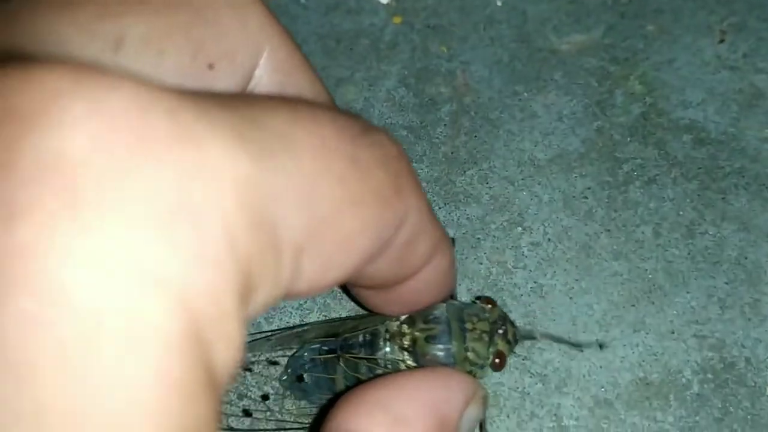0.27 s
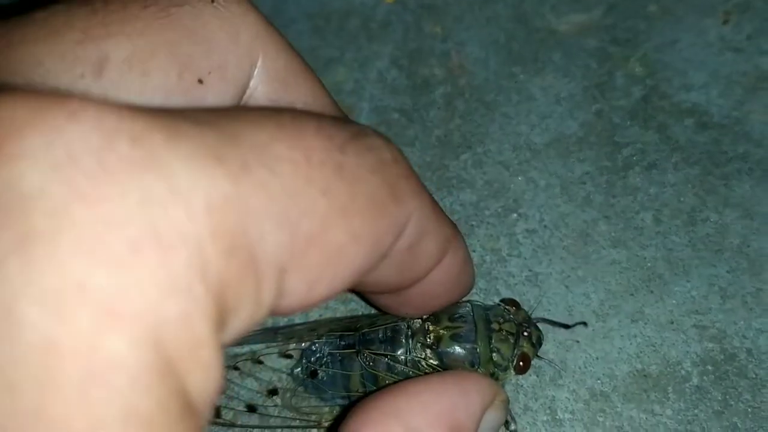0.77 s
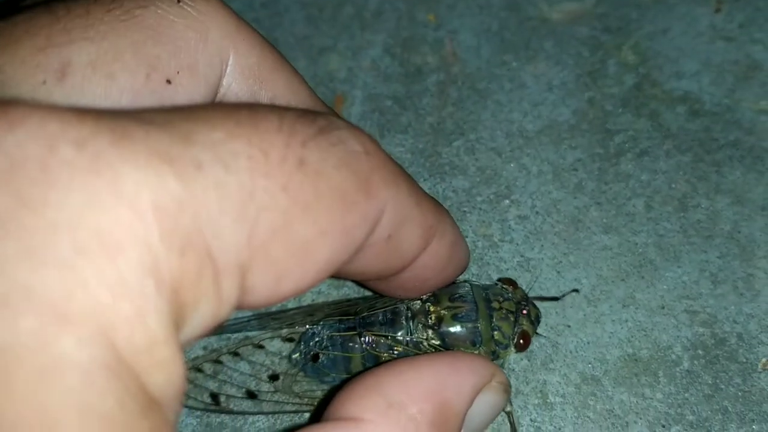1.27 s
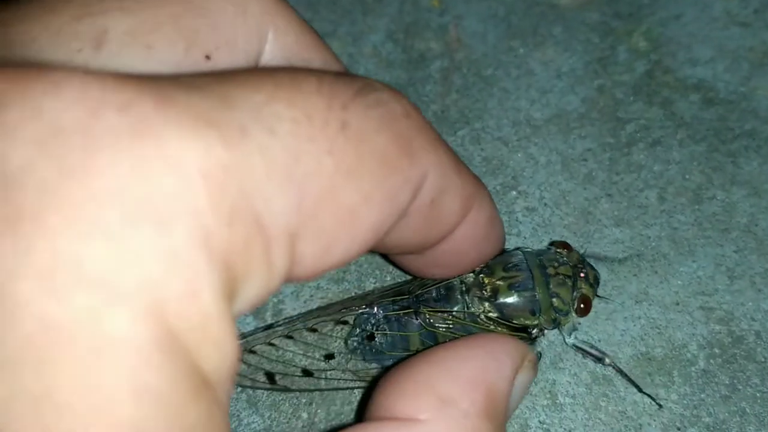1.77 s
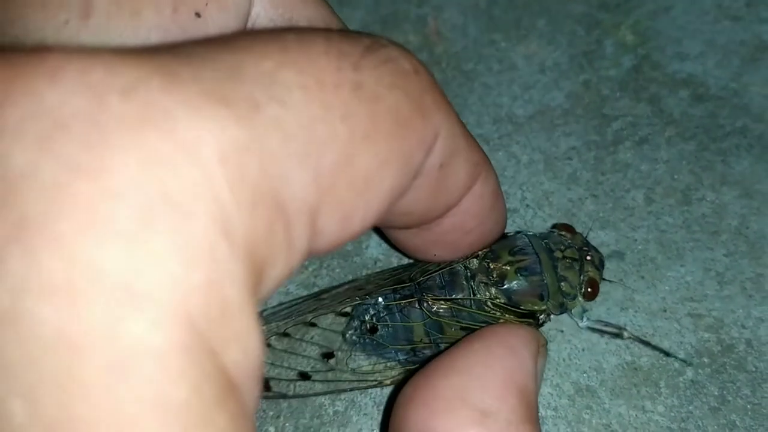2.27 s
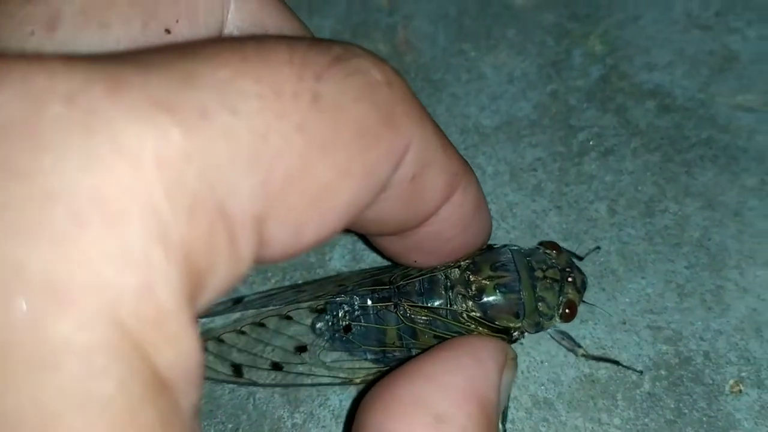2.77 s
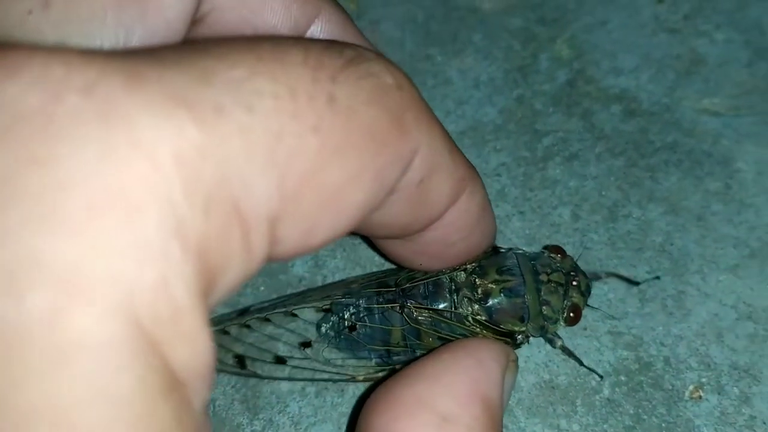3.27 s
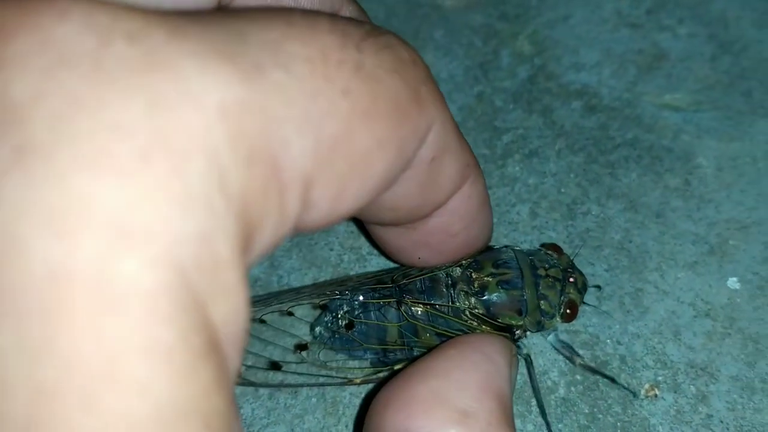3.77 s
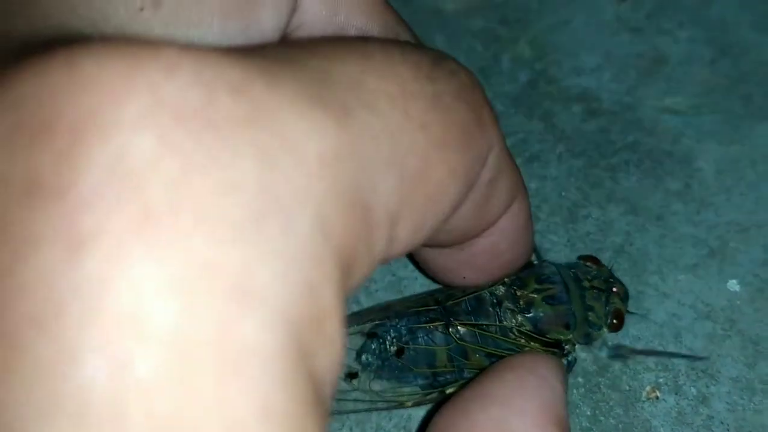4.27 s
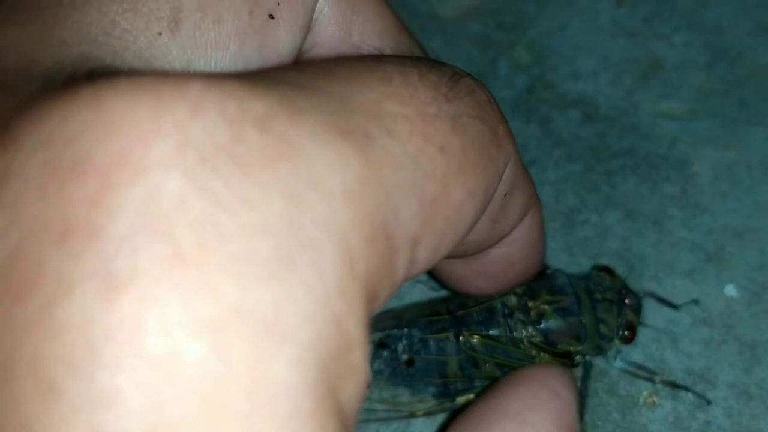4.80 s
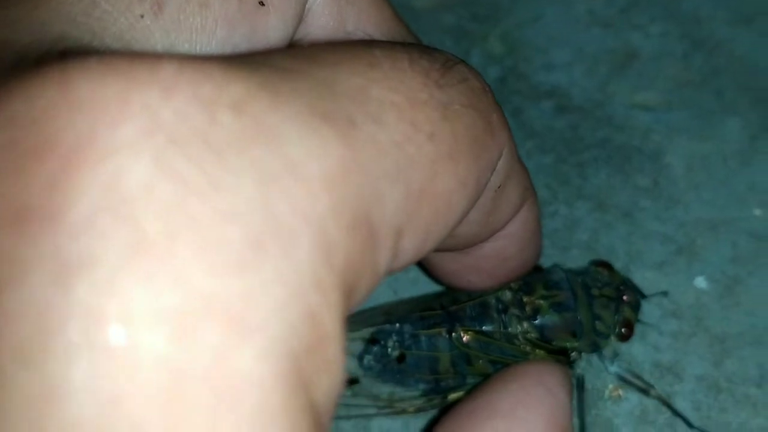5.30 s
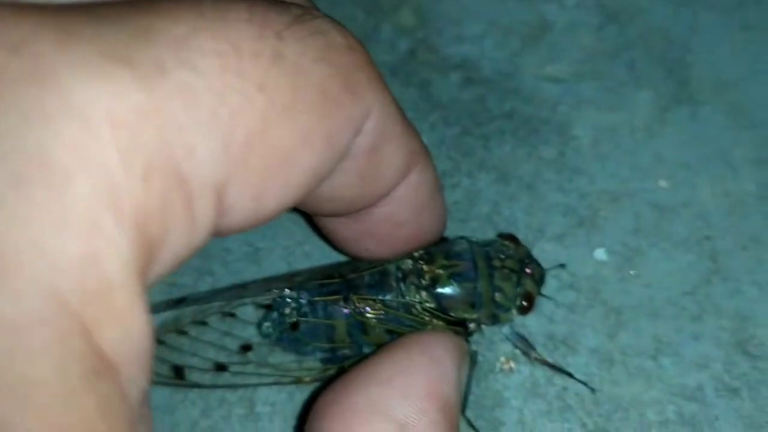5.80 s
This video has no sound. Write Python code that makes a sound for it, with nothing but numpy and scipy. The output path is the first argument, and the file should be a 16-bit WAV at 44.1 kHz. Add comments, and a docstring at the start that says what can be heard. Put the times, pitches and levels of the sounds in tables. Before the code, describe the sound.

Close, harsh cicada buzzes, some paired, break out and stop; a few tiny leg ticks follow above thin distant insect tones and mains hum.

```python
"""From the start a hum, a low rumble and thin, steady bands of far night insects lie under the scene.
At 0.4 s a cicada held between two fingers, close to the microphone, starts its short buzzes: its two tymbals
buckle in turn, each buckle a quick run of rib clicks over a falling note of the hollow abdomen.
Two small ticks fall at 2.2 s and the hum is fullest from 2.65 to 3.75 s; the last buzz ends at 4.1 s.
Then only a few ticks of legs and wings, and very faint claw scrapes, stand out from the background."""
import sys
import numpy as np
from scipy import signal
from scipy.fft import rfft, irfft, next_fast_len
from scipy.io import wavfile
from scipy.ndimage import map_coordinates

SR = 44100
rng = np.random.default_rng(int(sys.argv[2]) if len(sys.argv) > 2 else 0)


def materialize(psi):
    """Save the field psi as 16-bit PCM at rate SR to the path in sys.argv[1].

    A 1-D psi becomes a single channel; in a 2-D psi each row is a channel.
    """
    bounded = np.clip(np.atleast_2d(psi).T, -1, 1)
    quanta = np.round(bounded * 32767).astype(np.int16)
    wavfile.write(sys.argv[1], SR, quanta)


N = 266628  # samples

# buzzes, levels and pan before the trims in cicada(): first buckle t/s, last buckle t/s, buckle rate f/Hz,
#   final slowing/share, abdomen f/Hz, fall of its note/share, tymbal ring f/Hz,
#   ring peak level/dB against the other resonances, abdomen level/dB, body wall level/dB against the abdomen,
#   rib level/dB, snap level/dB, rib swell from start to end/dB, lean to the last ribs/dB, left over right/dB
BUZZES = [ (0.4174, .4175, 190, .35, 1005, 0.074, 5310, 1, -21, -14.5, -21.5, -27, 11, 3, 5),
          (.431, .5915, 192, 0.34, 1050, 0.16, 5380, -0.5, -22.5, -9, -21.5, -26.5, -0.5, -2.5, 3),
          (0.658, .667, 160, .35, 1090, .24, 5346, 4, -25.5, -7, -25, -30.5, 5, 1.5, 5.5),
          (1.628, 1.669, 205, 0.29, 1118, 0.063, 5230, 4, -21.5, -14, -35.5, -38, 5, -3, 5),
          (1.7774, 1.847, 192, 0.2, 1058, 0.15, 5285, 6, -24.5, -9.5, -30, -37.5, 8.5, -3, 5),
          (2.5723, 2.61, 180, 0.47, 1085, 0.24, 5730, -10, -25, -9.5, -30.5, -37.5, 4, 1.5, 7),
          (2.617, 2.6875, 200, .5, 1048, 0.29, 5710, 4.5, -26, -6, -23.5, -35.5, 3, 1, 6.5),
          (3.0214, 3.133, 186, 0.44, 1092, 0.29, 5810, -2, -25.5, -6.5, -21, -34, -1, 2, 3.5),
          (3.338, 3.449, 185, 0.44, 1050, .3, 5815, 4.5, -25.5, -6, -22, -34, 2.5, 2, 7.5),
          (4.0205, 4.1212, 183, 0.41, 1052, 0.18, 6204, 2, -21.5, -9.5, -19, -27.5, 1, 3, 2.5)]
# upper resonances of the tymbals: centre f/Hz, width f/Hz, left level/dB, right level/dB
TYMBAL_MODES = [(5525, 410, 3, -1.5), (6440, 570, -2.5, -10), (7290, 470, -1.5, -5), (8050, 350, -4, 0.5)]
# resonances of the body wall: centre f/Hz, width f/Hz, left level/dB, right level/dB
WALL_MODES = [(1480, 340, -8, -0.5), (2176, 330, 1, -4), (2740, 300, 2.5, -15), (3280, 340, 1, 5.5),
              (4170, 350, -10.5, -1)]
# colour of the abdomen's opening, which holds back the bass: f/Hz, level/dB
OPENING_COLOUR = [(500, -3), (700, -4), (860, -5.5), (1300, 4.5), (1480, 10.5), (1750, -8)]
# colour of a rib's dry snap: f/Hz, relative spectral level/dB
SNAP_COLOUR = [(500, -19), (4500, -6.5), (8000, -2), (9500, 0.5), (11000, -3), (12200, -1), (13600, -2.5),
               (14500, -6), (15300, -15), (15900, -28)]
# ticks of legs, wings and the grip: t/s, level/dB before the trim in ticks(), left over right/dB,
#   centre f/Hz, width f/Hz
TICKS = [(2.163, -25, 2, 5170, 2200), (2.1852, -29, 6, 5963, 1100), (4.714, -24.5, 6, 7000, 2000),
         (4.969, -24, 6, 8650, 7450), (5.1745, -33.5, 5, 7000, 3500), (5.943, -33, 7, 600, 900)]
# decay of the yard's answer: f/Hz, t60 t/s
YARD_DECAY = [(300, 0.05), (1200, .14), (6000, 0.2), (14000, 0.13)]
# distant insect choruses: centre f/Hz, width f/Hz, mean level/dB, left over right/dB
CHORUS_BANDS = [(3618, 584, -54.5, 6.5), (6643, 540, -53, 9), (7510, 240, -60.5, 5.5),
                (9240, 690, -59, 1.5), (10250, 800, -54.5, -1)]
# colour of the rumble and air: f/Hz, relative spectral level/dB
RUMBLE_COLOUR = [(20, -33), (36, -16.5), (48, -8.5), (58, 3), (74, -4), (110, -11), (140, -10.5),
                 (170, -17.5), (300, -19), (450, -23), (700, -29), (1200, -34.5), (3000, -33.5),
                 (10500, -52.5), (12000, -62)]
# likeness of the rumble at the two ports: f/Hz, left-right correlation/share
RUMBLE_LIKENESS = [(130, 0.87), (290, 0.99), (640, .54), (1400, 0)]

# each buzz starts with the abdomen a little weak and sharp; it builds up fast and its note sags slowly
SETTLE_S, START_WEAK_DB = 0.0062, 1.5
SAG_S, START_SHARP = 0.029, 0.025  # sharpness as a share of the pitch
SNAP_FOLLOWS = 0.72  # share of the ribs' swell that the snap follows
RELEASE_S, RELEASE_DB = 0.011, 2  # the ribs ease off as the muscles let go
# the hum holds full level between two times and fades slowly to either side
HUM_HZ, HUM_DB, HUM_FADE_DB_PER_S = 100.1, -36.5, 2
HUM_FULL_S, HUM_FADE_S = 2.65, 3.75
TOP_HZ = 15900


def cicada(note_db=0.5, ring_db=1.0, snap_db=4.0, ring_width_hz=520, ring_right_db=-5,
           tymbal_split=0.021, pan_offset_db=-2.0, lag_s=0.00019, buckle_s=0.007):
    """Every buckle sounds the abdomen and sets off a run of rib clicks in the tymbal and the body wall."""
    notes = np.zeros(N)
    rings, walls, snaps = np.zeros((3, 2, N))
    for (first, last, rate, slowing, abdomen_hz, fall, ring_hz, peak_db, abdomen_db, wall_db,
         rib_db, bright_db, swell_db, lean_db, pan_db) in BUZZES:
        times = buckle_times(first, last, rate, slowing)
        length_s = last - first + buckle_s
        span = slice(round(first * SR), round(last * SR) + SR // 40)
        age = np.arange(span.stop - span.start) / SR
        body_push_db, rib_push_db, snap_push_db = effort(age, length_s, swell_db)
        body_gain = amp(abdomen_db + body_push_db)

        note = np.zeros(N)
        for k, s in enumerate(times):
            sharp = START_SHARP * np.exp((first - s) / SAG_S)
            # one tymbal is tuned a little higher than the other
            split = tymbal_split * (-1) ** k
            hz = abdomen_hz * (1 + sharp + split + rng.normal(0, 0.016))
            add(note, s, amp(rng.normal(0, 0.95)) * abdomen_note(hz, fall))
        note = filtered(note[span], lambda hz: amp(along(OPENING_COLOUR, hz)))
        add(notes, first, body_gain * levelled(note, length_s))

        # each tymbal has its own paths out of the grip
        clicks = sum(between_fingers(rib_clicks(times[side::2], ring_hz, lean_db)[span]) for side in (0, 1))
        # muscle tension sets the tymbal's main resonance
        tymbal = list(TYMBAL_MODES) + [(ring_hz, ring_width_hz, peak_db, peak_db + ring_right_db)]
        ring = filtered(crackle(clicks, share=0.11), lambda hz: resonances(tymbal, hz))
        ring_gain = amp(rib_db + rib_push_db) * panned(pan_db + pan_offset_db)
        add(rings, first, ring_gain * levelled(ring, length_s))

        wall = filtered(crackle(clicks, share=1.0), lambda hz: resonances(WALL_MODES, hz))
        add(walls, first, body_gain * amp(wall_db) * levelled(wall, length_s))

        snap = filtered(crackle(clicks, share=0.76), lambda hz: amp(along(SNAP_COLOUR, hz)))
        add(snaps, first, amp(bright_db + snap_push_db) * levelled(snap, length_s))

    # the note reaches the right port first
    ports = np.array([[-1], [1]])
    notes = filtered(notes, lambda hz: np.exp(1j * np.pi * hz * lag_s * ports))
    return notes * amp(note_db) + walls + rings * amp(ring_db) + snaps * amp(snap_db)


def buckle_times(first, last, rate, slowing, slow_s=.021, limp=.05, jitter_s=.00018):
    """The two tymbals take turns, a little unevenly, and slow down as the muscles let go."""
    t = np.linspace(first, max(first, last), 200)
    rate_now = rate * (1 - slowing * np.exp((t - t[-1]) / slow_s))
    turns = np.cumsum(rate_now) * (t[1] - t[0])
    times = np.interp(np.linspace(0, turns[-1], round(turns[-1]) + 1), turns, t)
    late = limp / rate * (np.arange(len(times)) % 2)  # every second buckle
    return times + late + rng.normal(0, jitter_s, len(times))


def effort(age, length_s, swell_db):
    """Level course of a buzz in dB: the abdomen builds up, the ribs swell and ease off, their snap follows."""
    start = START_WEAK_DB * np.exp(-age / SETTLE_S)
    swell = swell_db * (np.minimum(age / length_s, 1) - .5)
    release = RELEASE_DB * np.exp(np.minimum(age - length_s, 0) / RELEASE_S)
    return -start, swell - release, SNAP_FOLLOWS * swell - release


def abdomen_note(hz, fall, length_s=0.0073):
    """One buckle pumps the air sac: a few cycles that swell, sink in pitch and fade."""
    u = np.arange(int(length_s * SR)) / (length_s * SR)
    phase = 2 * np.pi * np.cumsum(hz * (1 + fall * (.42 - u * 1.29))) / SR
    return np.sin(phase) * np.sin(np.pi * u ** 0.64) ** 1.06


def rib_clicks(times, ring_hz, lean_db, lead_s=.0006, scatter_s=.000015, scatter_db=0.2):
    """In each buckle four ribs give way in turn, six ring cycles apart, so that each one feeds the ring."""
    gap_s = 6 / ring_hz
    ribs_db = np.array([-2.5, -21.5, -2.5, -4.5]) + lean_db * np.linspace(-1, 1, 4)
    clicks = np.zeros(N)
    for s in times:
        at = s + lead_s + gap_s * np.arange(4) + np.cumsum(rng.normal(0, scatter_s, 4))
        for rib_s, db in zip(at, ribs_db):
            add(clicks, rib_s, amp([db + rng.normal(0, scatter_db)]))
    return clicks


def between_fingers(clicks, rise_s=0.00011, raw_t60=0.0094):
    """Scattering in the grip smears each click in time, differently for each port."""
    t = np.arange(SR // 50) / SR
    envelope = (1 - np.exp(-t / rise_s)) * amp(-60 * t / raw_t60)  # before the spectrum is flattened
    paths = rfft(rng.standard_normal((2, len(t))) * envelope)
    lead = SR // 500
    # flattened, the paths shift phases only and leave the colour nearly alone
    smear = np.roll(irfft(paths / np.abs(paths)), lead, axis=1)[:, :len(t) // 2]
    return signal.fftconvolve(clicks[None], smear, axes=1)[:, lead:lead + len(clicks)]


def crackle(clicks, share):
    """No two buckles crease alike: a share of the clicks' energy is fresh noise under their envelope."""
    fade = amp(-120 * np.arange(SR // 200) / SR / .004)  # power falls 60 dB in 4 ms
    power = np.abs(signal.fftconvolve(clicks ** 2, fade[None], axes=1))[:, :clicks.shape[1]]
    share = np.clip(share, 0, 1)
    noise = unit(np.sqrt(power) * rng.standard_normal(clicks.shape))
    return np.sqrt(1 - share) * unit(clicks) + np.sqrt(share) * noise


def resonances(modes, hz):
    """Left and right gain of bell-shaped resonances, summed in power."""
    power = 0
    for centre, width, left_db, right_db in modes:
        bell = 1 / (1 + 2 * ((hz - centre) / width) ** 2)
        power = power + (amp([[left_db], [right_db]]) * bell) ** 2
    return np.sqrt(power)


def ticks(t60=0.014, trim_db=-5):
    """Legs and wings flick against the fingers: short bursts of band noise that die away fast."""
    out = np.zeros((2, N))
    t = np.arange(SR // 30) / SR
    for s, db, pan_db, hz, width in TICKS:
        burst = band(rng.standard_normal((2, len(t))), hz, width)
        add(out, s, amp(db + trim_db - 60 * t / t60) * panned(pan_db) * burst)
    return out


def scrapes(level_db=-78, unrest_db=4, centre_hz=13000, width_hz=3500):
    """Claws scrape very faintly on the skin: high band noise that comes in fits and starts."""
    hiss = band(rng.standard_normal((2, N)), centre_hz, width_hz)
    return amp(level_db + unrest_db * np.minimum(wobble(14), 2)) * hiss


def yard(x):
    """A short, faint answer from the concrete floor and the walls: noise that decays band by band."""
    hz, t, z = signal.stft(rng.standard_normal((2, SR // 3)), SR, nperseg=256)
    decay = amp(-60 * t / along(YARD_DECAY, hz)[:, None])
    tail = signal.istft(z * decay, SR, nperseg=256)[1]
    return signal.fftconvolve(x, tail / np.linalg.norm(tail[0]), axes=1)[:, :N]


def night_chorus(shimmer_db=0.9, edge_hz=11000):
    """Many far insects merge into a few thin bands of noise, steady but for a slight shimmer."""
    bands = np.zeros((2, N))
    for hz, width, db, pan_db in CHORUS_BANDS:
        level = amp(db + shimmer_db * wobble(25))
        bands += level * panned(pan_db) * band(rng.standard_normal((2, N)), hz, width)
    return filtered(bands, lambda hz: 1 / (1 + (hz / edge_hz) ** 40))


def hum(waver_db=-0.75, drift_rad=0.15, overtone_db=-25):
    """A mains hum with a weak octave; its level and phase waver slightly."""
    t = np.arange(N) / SR
    outside_s = np.abs(t - np.clip(t, HUM_FULL_S, HUM_FADE_S))
    level_db = HUM_DB - HUM_FADE_DB_PER_S * outside_s
    phase = 2 * np.pi * HUM_HZ * t + drift_rad * wobble(2.9)
    tone = unit(np.sin(phase) + amp(overtone_db) * np.sin(2 * phase))
    return tone * amp(level_db + waver_db * wobble(20)) * panned(1.0)


def rumble(level_db=-42.5):
    """A low rumble with faint air: alike at both ports in the bass, unrelated higher up."""
    def colour(hz):
        # sharing out mid and side by this angle sets the likeness
        angle = np.arccos(np.clip(along(RUMBLE_LIKENESS, hz), -1, 1)) / 2
        return amp(along(RUMBLE_COLOUR, hz)) * [np.cos(angle), np.sin(angle)]

    mid, side = filtered(rng.standard_normal((2, N)), colour)
    return amp(level_db) * unit(np.array([mid + side, mid - side])) * panned(0.71)


def amp(db):
    """Gain from decibels."""
    return 10 ** (np.asarray(db) / 20)


def unit(x):
    """x at rms 1."""
    return x / np.sqrt(np.mean(x ** 2) + 1e-20)


def levelled(x, length_s):
    """x with the energy of rms 1 held for length_s, averaged over its channels."""
    return x * np.sqrt(length_s * SR / np.mean(np.sum(x ** 2, axis=-1)))


def along(points, hz):
    """Read (f/Hz, value) points on a log frequency axis."""
    f, v = np.transpose(points)
    return np.interp(np.log(hz + 1), np.log(f + 1), v)


def wobble(rate):
    """A smooth random curve, rate knots a second."""
    knots = rng.standard_normal(int(N * rate / SR) + 4)
    return map_coordinates(knots, [np.arange(N) * rate / SR])


def filtered(x, response):
    """x shaped by a response over frequency."""
    n = x.shape[-1]
    m = next_fast_len(n + 2048)
    return irfft(rfft(x, m) * response(np.fft.rfftfreq(m, 1 / SR)), m)[..., :n]


def band(x, centre_hz, width_hz):
    """x through a bell-shaped band, at rms 1."""
    return unit(filtered(x, lambda hz: 1 / (1 + ((hz - centre_hz) / width_hz * 2) ** 2 / 2)))


def panned(db):
    """Left and right gains for a level difference, left over right."""
    return amp(np.array([np.atleast_1d(db), -np.atleast_1d(db)]) / 2)


def add(track, s, sound):
    """Mix a sound into a track at time s."""
    i = round(s * SR)
    track[..., i:i + sound.shape[-1]] += sound


def scene(wet_db=-20):
    """The insect in front, the night behind."""
    near = cicada() + ticks() + scrapes()
    return near + amp(wet_db) * yard(near) + night_chorus() + hum() + rumble()


def record(dry):
    """The recorder rounds off the very highest peaks and keeps nothing above its band limit."""
    rounded = dry / (1 + np.abs(dry / .8) ** 6) ** (1 / 6)
    return filtered(rounded, lambda hz: hz < TOP_HZ)


dry = scene()
out = record(dry)
materialize(out)
```